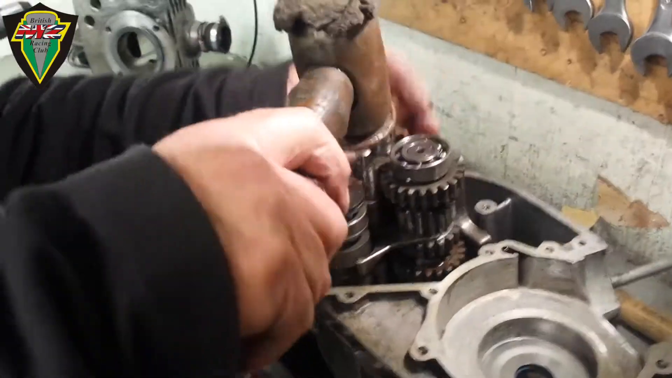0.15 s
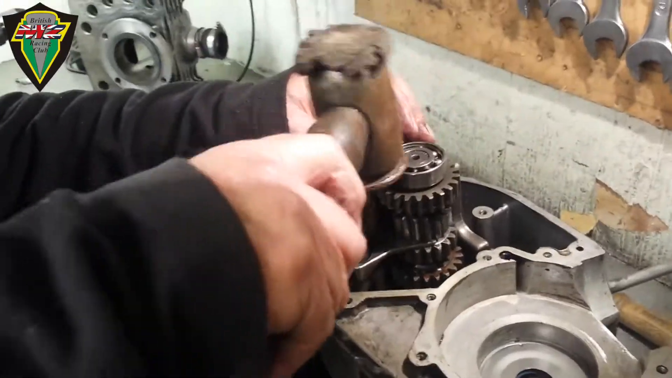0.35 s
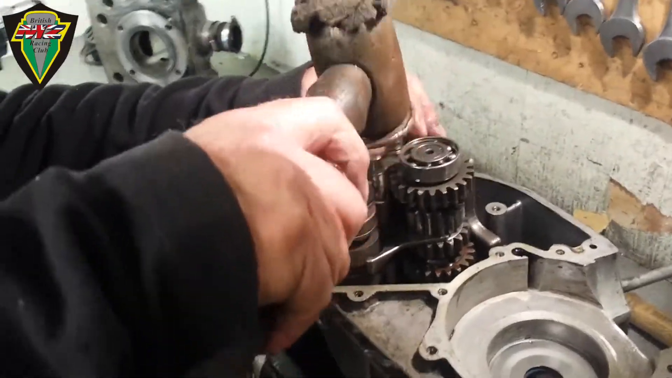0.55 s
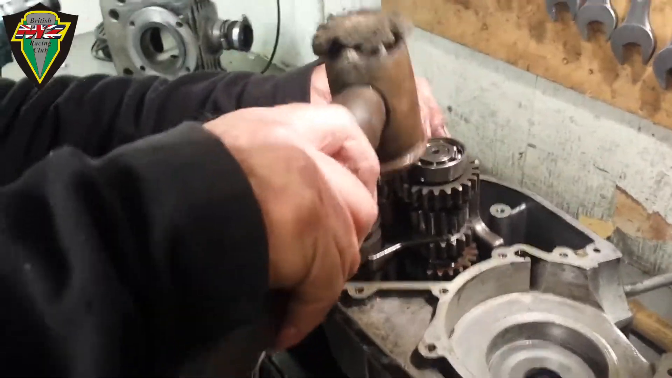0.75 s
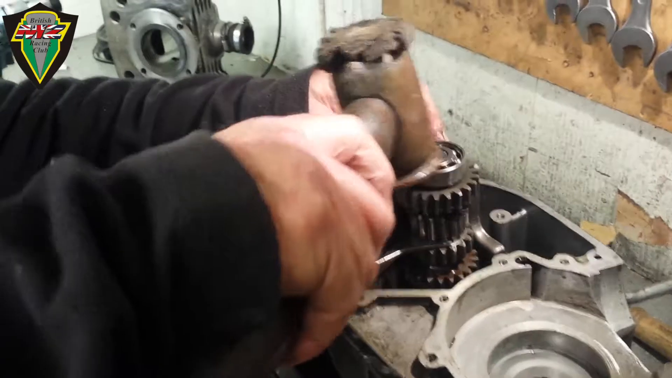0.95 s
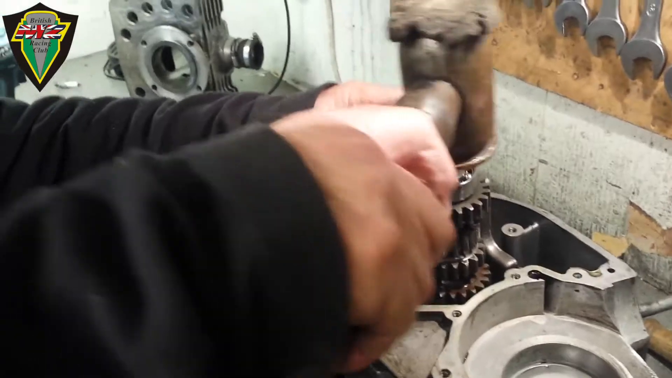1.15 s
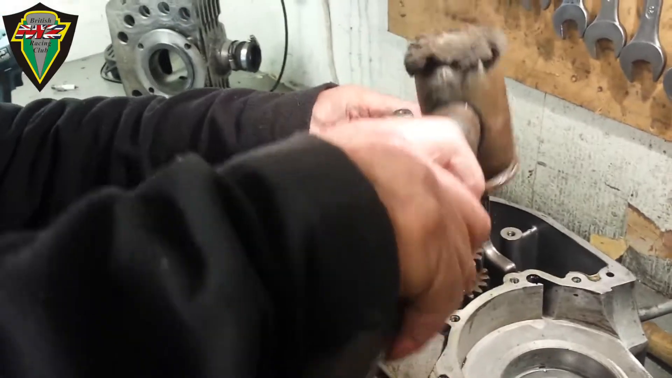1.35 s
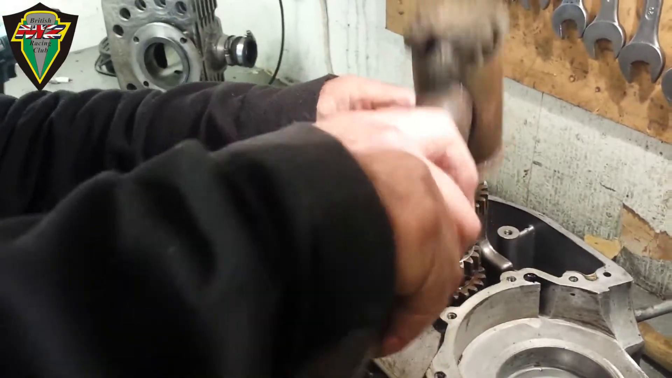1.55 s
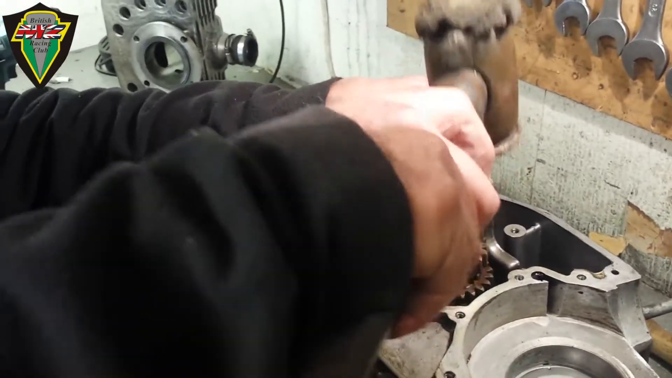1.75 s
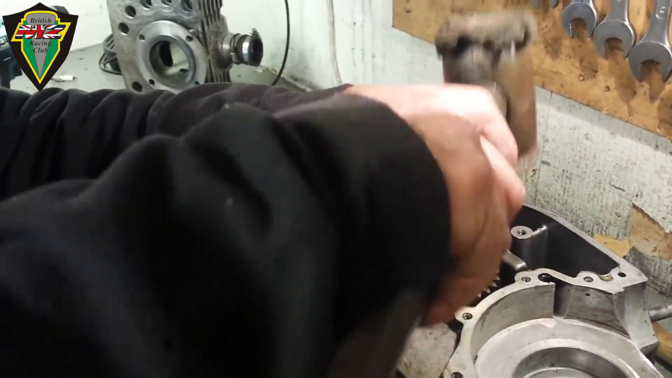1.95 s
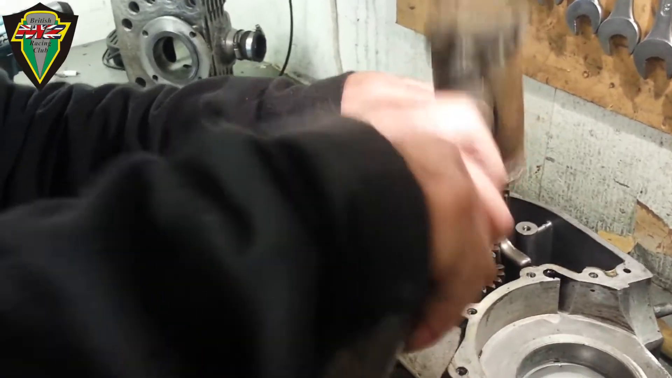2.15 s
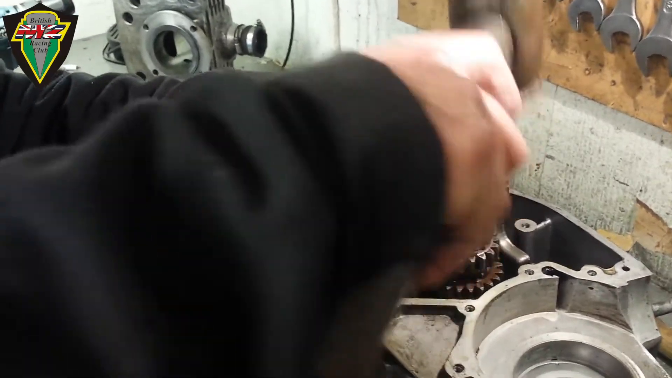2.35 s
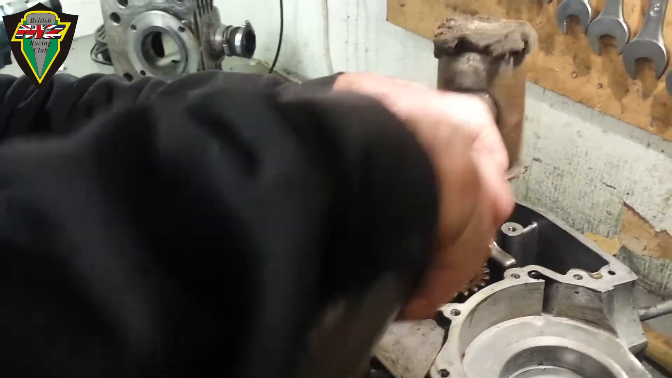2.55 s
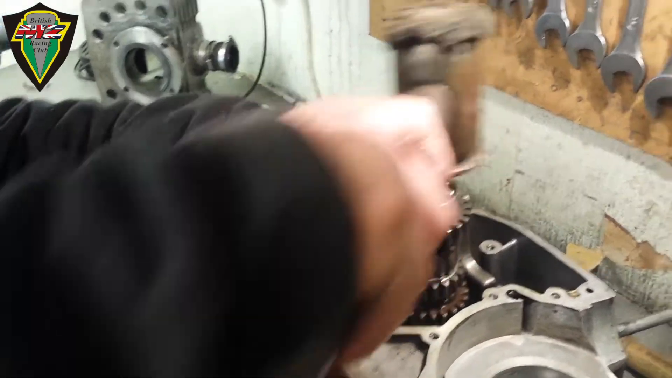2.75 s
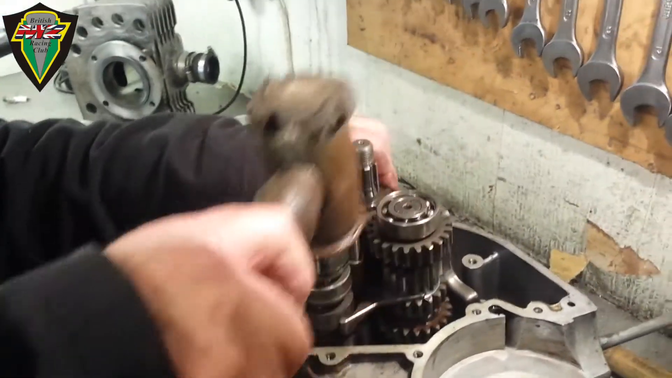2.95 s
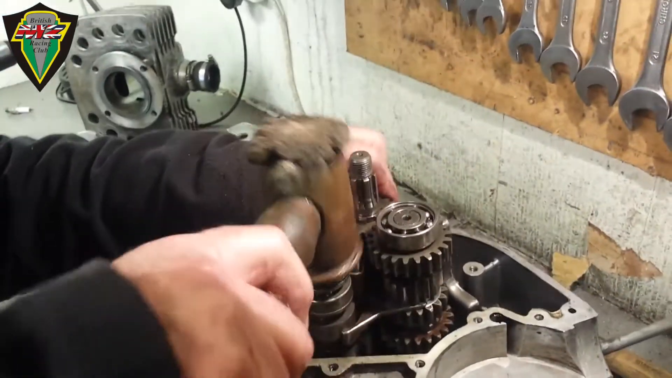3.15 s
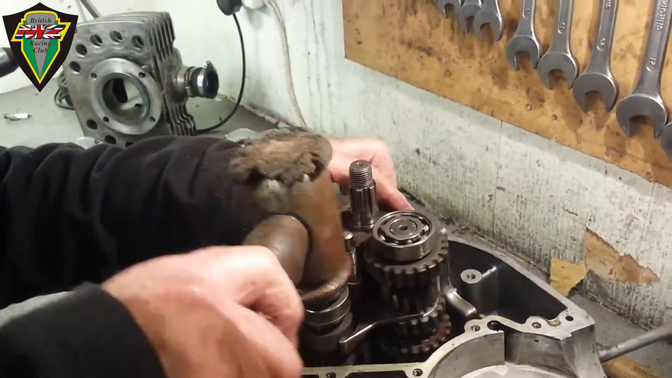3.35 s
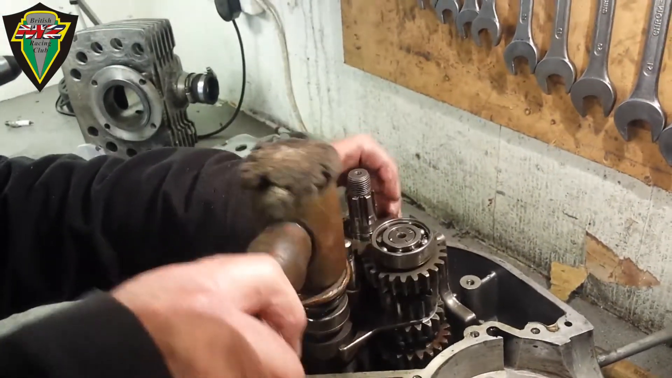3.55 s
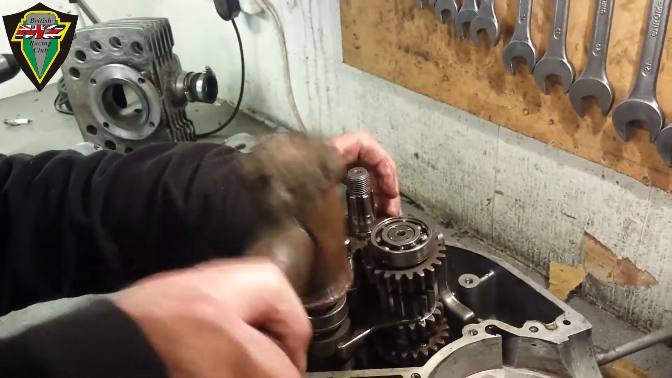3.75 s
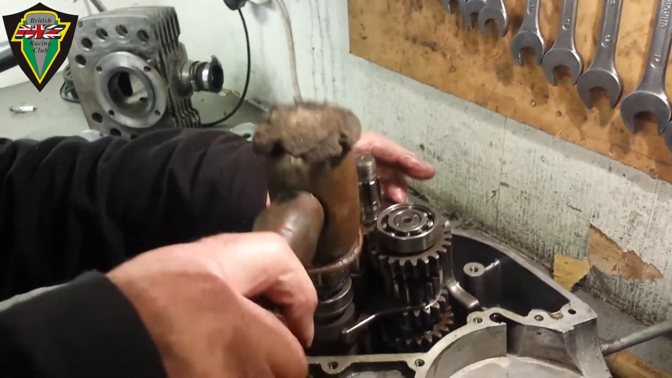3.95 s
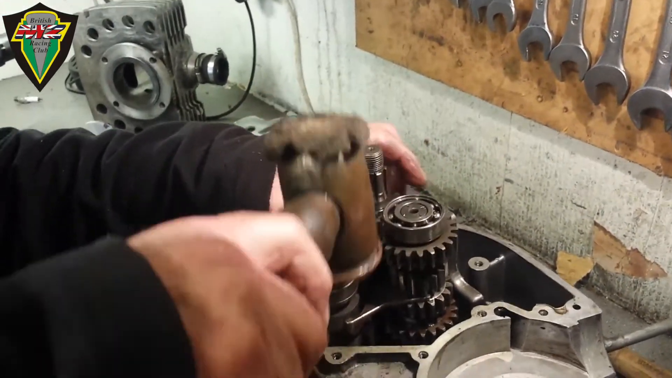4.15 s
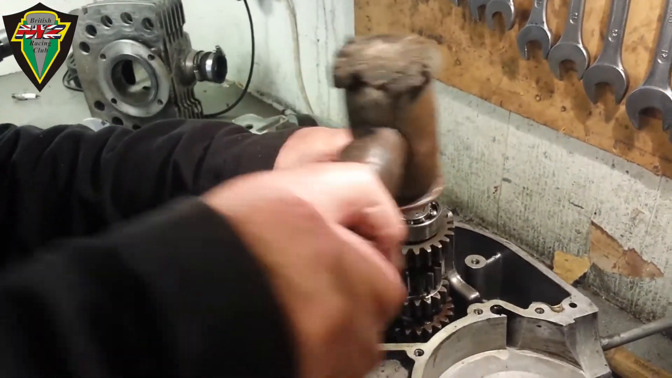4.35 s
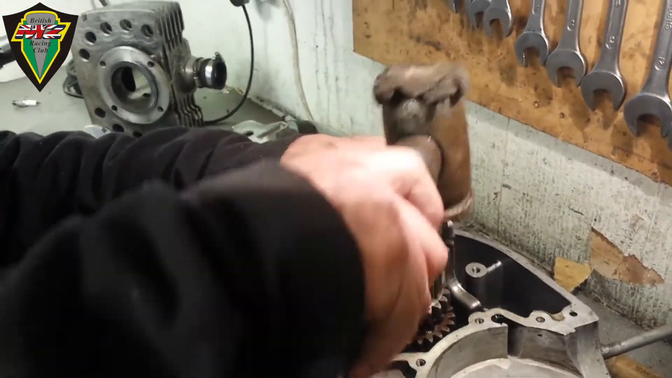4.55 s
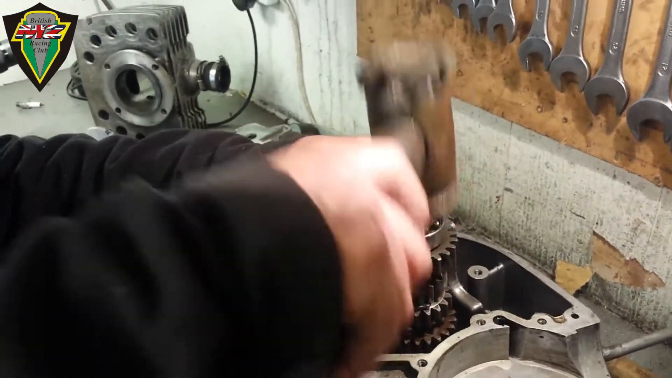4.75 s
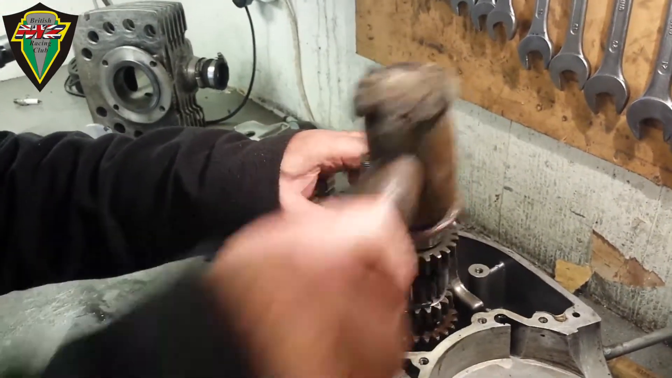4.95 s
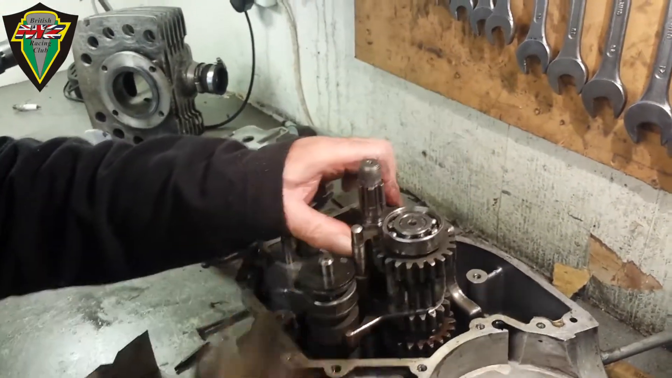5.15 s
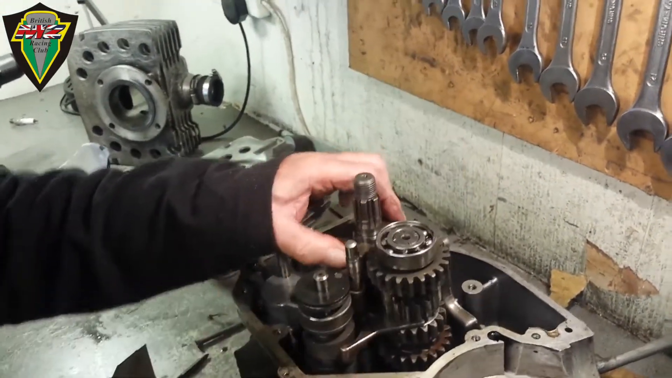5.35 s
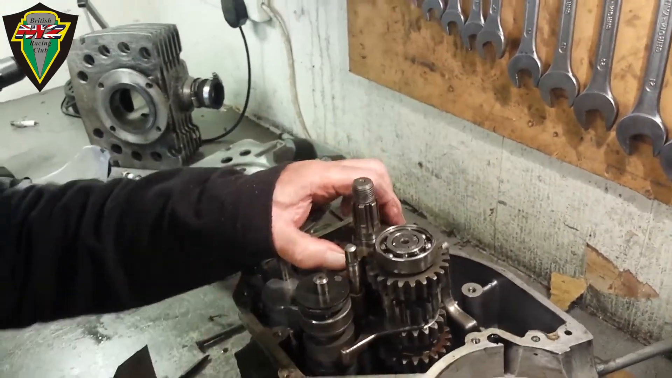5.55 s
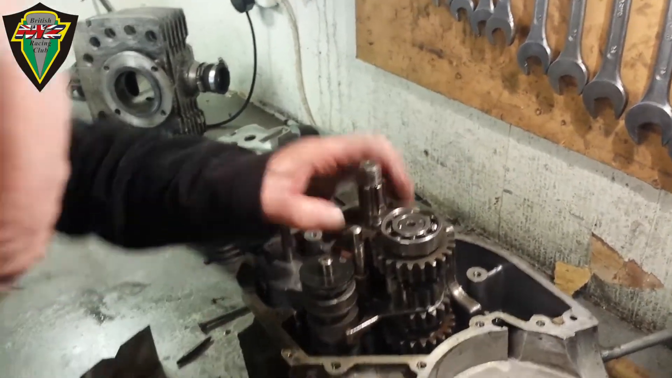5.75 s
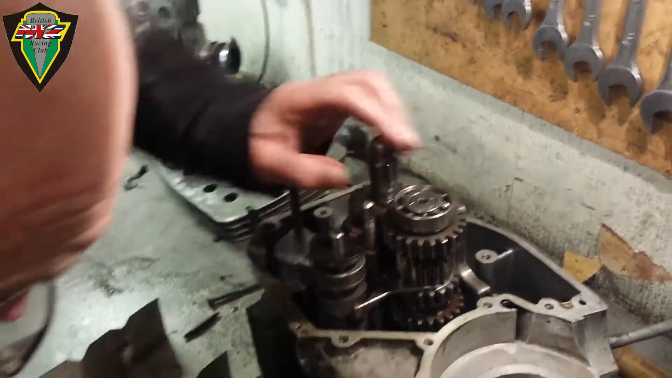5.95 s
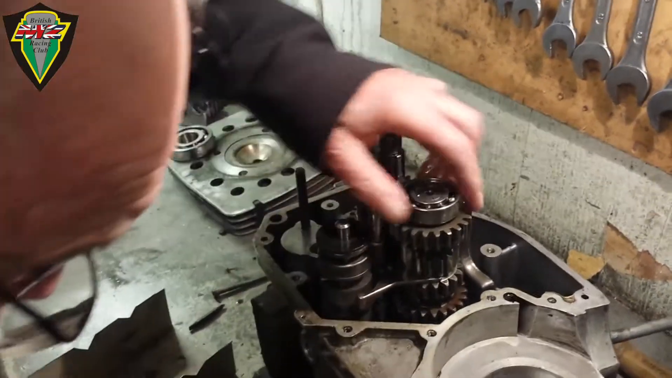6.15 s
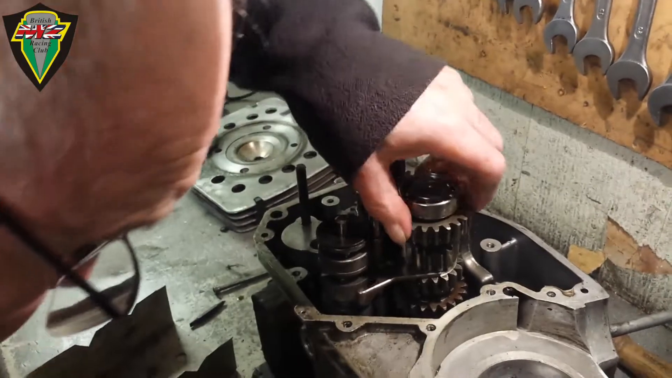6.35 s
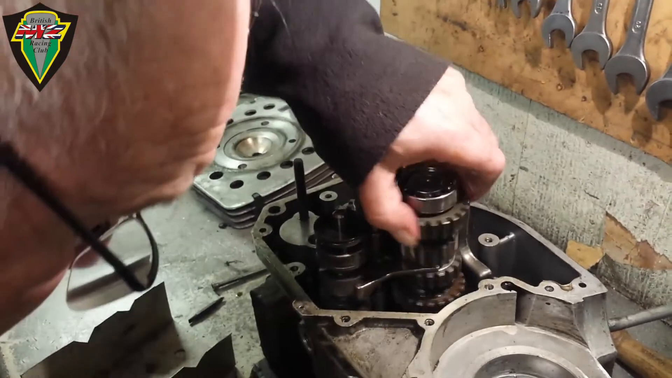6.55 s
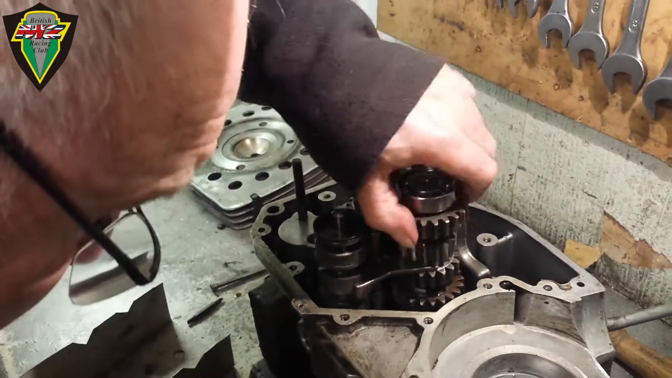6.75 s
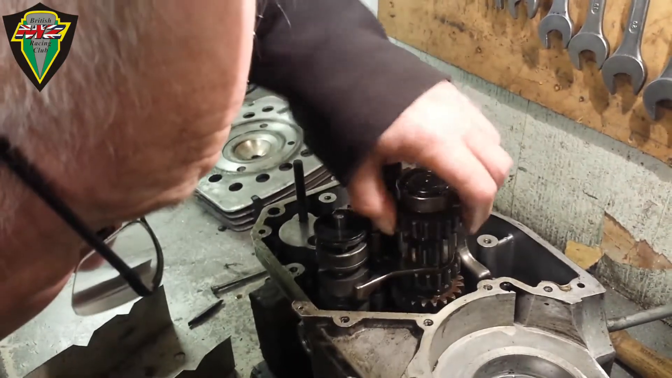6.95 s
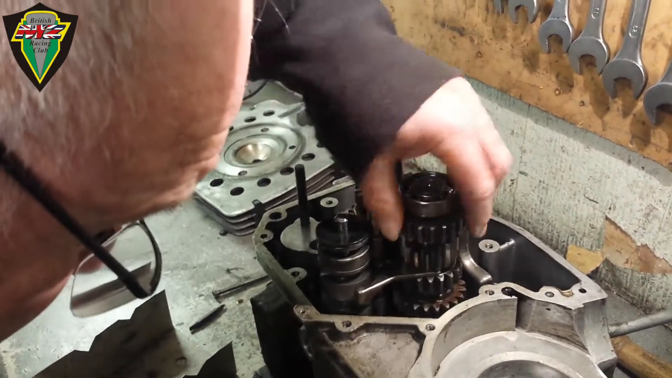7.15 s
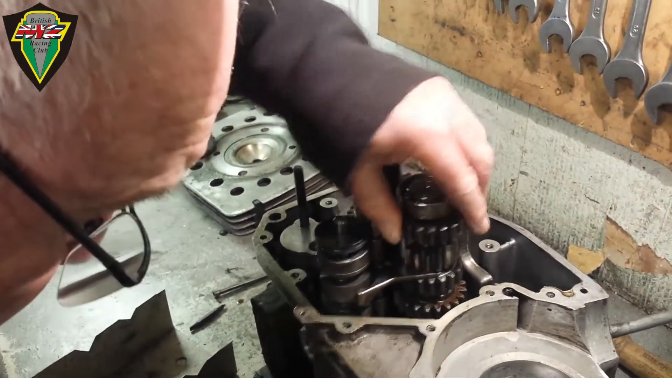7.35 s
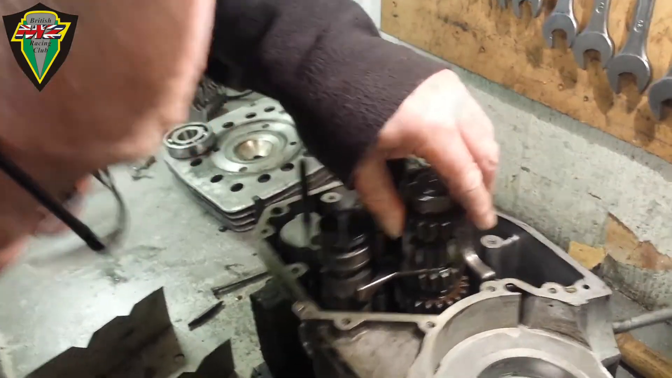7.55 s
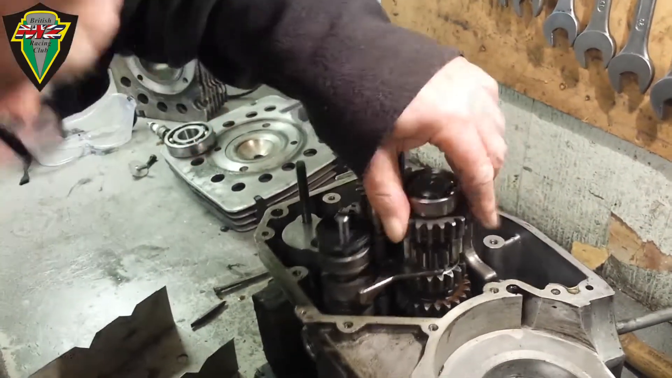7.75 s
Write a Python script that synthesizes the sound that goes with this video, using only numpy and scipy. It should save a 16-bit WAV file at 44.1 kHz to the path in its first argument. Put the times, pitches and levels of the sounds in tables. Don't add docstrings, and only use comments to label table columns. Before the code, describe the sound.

Irregular mallet taps, roughly three or four a second, clatter brightly on gears and casing, with brief pauses and two faint taps midway. The last firm blow is followed by the mallet landing and settling on wood. Room hum and hiss swell up in the lull, then dense small gear clicks, gritty scraping and soft thumps finish it. Close phone pickup, short room echo.

```python
import sys
import numpy as np
from scipy import signal
from scipy.fft import rfft, irfft
from scipy.io import wavfile
from scipy.ndimage import uniform_filter1d

SR = 44100
rng = np.random.default_rng(int(sys.argv[2]) if len(sys.argv) > 2 else 0)


def convert_level_to_amplitude(level_db):
    exponent = np.asarray(level_db, float) / 20
    return 10 ** exponent


def master(y):
    cut = np.clip(np.atleast_2d(y).T, -1, 1)
    pcm = np.round(cut * 32767)
    wavfile.write(sys.argv[1], SR, pcm.astype(np.int16))


N = 344421
HZ = np.fft.rfftfreq(N, 1 / SR)

# t/s, casing peak level/dB, bench level/dB, bright clatter level/dB, note of the struck spot f/Hz
FRONT_BLOWS = [
    (0.4351, -12, -25.5, -18, 1930),
    (0.7369, -6, -8, -14.5, 4140),
    (0.9645, -11.5, -11.5, -14.5, 3262),
]
BACK_BLOWS = [
    (1.3871, -3, -10.5, -9.5, 1717),
    (1.6818, -6.5, -16.5, -24.5, 3300),
    (1.9692, -7, -16.5, -20.5, 1844),
    (2.2693, -6, -16, -16, 2290),
    (2.598, 0, -11, -10, 2406),
    (4.5807, -6.5, -14.5, -12.5, 2660),
    (4.9253, -3.5, -14, -17.5, 2820),
]
LEFT_BLOWS = [
    (3.4015, -11.5, -22, -18.5, 2570),
    (3.6016, -7, -17.5, -12.5, 2840),
    (3.8748, -5, -15, -15.5, 2075),
    (4.1449, -1, -18.5, -16, 2163),
]
LIGHT_BLOWS = [
    (2.823, -36.5, -52, -41.5, 1985),
    (3.2151, -32, -31, -73, 3520),
]
LAID_DOWN = [
    (5.573, -14, -10, -28, 2990),
    (5.805, -26, -11.5, -30, 2740),
    (5.883, -38.5, -26, -37, 1510),
]
# t/s, peak level/dB, f/Hz, 60 dB decay/s
SPOT_NOTES = [(0.4352, -30, 860, 0.059), (0.4352, -20, 2470, 0.053), (2.8235, -46.5, 2050, 0.12),
              (2.824, -50, 5940, .06), (2.824, -48, 4812, 0.036), (3.216, -32, 703, 0.016),
              (0.972, -20, 559, 0.081), (1.388, -14.5, 1700, 0.087), (4.146, -21.5, 782, 0.032),
              (4.158, -24, 336.4, 0.16), (1.971, -22, 3260, 0.059), (2.6, -23.5, 5460, .12),
              (3.402, -25, 654, 0.04), (3.402, -24, 1335, 0.025), (5.576, -25, 723, 0.055),
              (5.577, -35, 1053, 0.11), (5.806, -25.5, 5722, 0.091), (5.808, -36, 1020, 0.16),
              (5.886, -40, 1735, .05)]
# t/s, level/dB
CAGE_SHIVERS = [
    (0.968, -33),
    (2.6, -42.5),
    (4.582, -32),
    (4.927, -29),
]
# t/s, peak level/dB, pitch
# f/Hz
TICKS = [(0.2738, -44, 2060), (0.6448, -48, 2770), (0.6934, -50, 3000), (1.5682, -48, 1780),
         (2.149, -52, 5130), (3.8174, -41, 2770), (4.0494, -53, 1950), (5.7253, -49, 2780),
         (5.819, -33, 2780), (5.831, -33, 2880), (5.7872, -48, 5270),
         (2.98, -48, 1790),
    (3.006, -52, 5340),
    (3.342, -56, 3420),
    (3.388, -44, 2590),
    (5.354, -47, 1790),
    (5.392, -50, 2810),
    (5.415, -50, 1780),
    (6.487, -45, 3030),
    (6.537, -46, 2830),
    (6.585, -48, 2860),
]
# t/s, peak level/dB, main note f/Hz, second note f/Hz
TEETH = [(6.7268, -32.5, 1120, 1840), (6.7371, -29.5, 2790, 5000), (6.7985, -38.5, 2320, 1310),
         (6.8921, -30, 2350, 2815), (6.9152, -34, 2700, 3130), (6.931, -27.5, 1340, 1860),
         (6.9376, -23, 2336, 2804), (7.003, -26, 4382, 7080), (7.0194, -35, 2070, 2820),
         (7.0818, -35.5, 2310, 2670), (7.0873, -36, 2503, 2212), (7.1347, -34.5, 2260, 5700),
         (7.229, -34, 1446, 2820), (7.2552, -36, 1990, 1140), (7.3255, -28.5, 1860, 2820),
         (7.3757, -23, 2000, 5740), (7.3974, -27.5, 1990, 5160), (7.4276, -26.5, 1830, 2370),
         (7.4465, -23, 1920, 3350), (7.4924, -24, 1921, 5260), (7.509, -23, 1834, 5000),
         (7.5458, -38, 2783, 1860), (7.5638, -28, 1830, 2830), (7.5842, -30.5, 1814, 2100),
         (7.612, -23, 1930, 4870), (7.675, -29.5, 1850, 3360), (7.679, -27.5, 7150, 2410),
         (7.7139, -34, 2770, 1740), (7.7369, -29.5, 2860, 2583), (7.8004, -28, 2850, 1840)]
# t/s, peak level/dB
ROLL = [
    (0.797, 3.5),
    (0.825, 1),
    (0.988, -14),
    (5.584, 10.5),
    (5.829, 3),
    (5.846, 4),
    (5.855, 4.5),
    (5.901, -14),
]
# t/s, peak level/dB
THUMPS = [(0.01, -18), (0.4533, -11), (6.726, -44), (6.931, -17.5), (7.326, -15.5), (7.436, -7.5),
          (7.51, -12), (7.579, -11.5), (7.658, -16), (7.711, -5.5), (7.74, -43), (7.793, -7)]
# t/s, effort level/dB
ROCKING = [(6.6, -44), (6.74, -17), (6.87, -35), (6.9, -9.5), (6.94, -1), (7.02, -4), (7.07, -17),
           (7.21, -22), (7.24, -17), (7.3, -15), (7.38, -5.5), (7.55, -2), (7.66, -4.5), (7.81, -20)]
# t/s, level/dB, f/Hz
SHELF = [
    (4.93, -51, 349),
    (2.9, -57, 170),
]

# f/Hz, width/Hz, level/dB
FRONT_RIM = [(1960, 26, -3), (2480, 20, 0), (3270, 23, -3), (4200, 21, -3), (5520, 74, -2), (6090, 25, -5),
             (6380, 35, -2), (6930, 27, 0), (7190, 42, -7)]
FRONT_END = [(2480, 38, -4), (2700, 35, -5), (3640, 23, -6), (4030, 210, -2), (5020, 22, -5),
             (5360, 150, -6), (5750, 45, 0), (6860, 27, -11), (7830, 67, -8)]
FRONT_GEAR = [(1310, 59, -9), (1780, 27, -8), (2800, 45, -9), (3280, 42, 0), (4000, 33, -5), (5030, 31, -5),
              (5940, 37, -7), (6570, 91, -11), (7990, 44, -14)]
BACK = [(1780, 36, -2), (2050, 100, -8), (2350, 36, -2), (2810, 60, -5), (3330, 86, -6), (5440, 37, -9),
        (5650, 42, 0), (6000, 48, -12), (6900, 51, -16), (7580, 160, -18), (8630, 36, -16), (9090, 49, -21)]
LEFT = [(1880, 27, -6), (2060, 22, -2), (2300, 28, 0), (2790, 38, -5), (3470, 30, -8), (4150, 32, -9),
        (4550, 17, -9), (5100, 69, -9), (5670, 78, -1), (6520, 78, -11), (6950, 35, -11), (7780, 27, -17)]
TOP = [(1720, 23, -5), (2400, 24, -5), (2630, 25, -5), (2800, 49, 0), (3600, 57, -10), (3840, 29, -8),
       (4300, 81, -4), (4570, 36, -5)]
GEARS = [(1800, 120, -2), (1920, 200, 0), (2070, 24, -3), (2350, 64, -4), (2810, 60, -5), (3350, 89, -6),
         (4600, 96, -8), (5010, 110, -6), (6900, 83, -13)]
# f/Hz, level/dB, 60 dB decay/s
BENCH = [(117, -19, .8), (130, 0, .24), (173, -4, .12), (205, -22, .5), (217, -6, .13), (250, -6, .1),
         (280, -6, .11), (314, -3, .14), (352, -6, .12), (386, -9, .1), (460, -20, .1), (540, -16, .1),
         (640, -18, .08), (750, -21, .06)]
PLANK = [(135, -4, .18), (180, -5, .07), (208, -9, .1), (312, -6, .09), (336, 0, .1), (381, -5, .09),
         (498, -8, .08), (540, -7, .06), (580, -4, .06), (670, -13, .07), (870, -16, .06), (990, -16, .08),
         (1250, -18, .08), (1450, -21, .06)]
PLANK_END = [(131, -2, .2), (178, -1, .06), (222, -7, .11), (300, -9, .06), (338, -2, .11), (390, -4, .09),
             (464, -14, .12), (540, -13, .1), (690, -9, .09), (745, -11, .09), (860, -9, .08),
             (1080, -17, .06), (1300, -17, .05)]
LEGS = [(57, 0, .5), (62, -8, .3)]
THUD = [(165, 0, .05), (235, -1, .045), (300, -2, .04), (365, -4, .04)]
MALLET = [(5670, 0, .16), (5570, -3, .1), (5770, -4, .08), (7790, -15, .12), (11350, -24, .1),
          (13070, -22, .1), (14900, -28, .07)]
MALLET_SIDE = [(5650, -4, 0.065), (5200, -6, 0.053), (7780, -3, 0.49), (11270, -6, 0.09),
               (13070, -13, 0.21), (14800, -20, .08)]
SEATED_SHAFT = [(2062, 0, .42), (2600, -6, .35), (3400, -6, .12)]
# f/Hz, level/dB
CLATTER = [(440, -10), (720, -15), (1130, -21), (1800, -12.5), (2800, -15), (5740, -15.5), (7500, -19),
           (16000, -38.5)]
FRONT_CLATTER = [(440, -10), (1200, -13), (2000, -18), (2600, -10), (4170, -8.5), (5740, -8.5), (7500, -22),
                 (16000, -50)]
TOOTH_CLATTER = [(440, -10.5), (1200, -23.5), (1900, -15.5), (2800, -11.5), (4170, -13.5), (5400, -8.5),
                 (7500, -15.5), (16000, -37)]

# f/Hz, level/dB, 60 dB decay/s
ECHO = [(60, 11.5, 0.91), (250, 5.5, 0.28), (1010, 7.5, 0.25), (3000, -3.5, 0.3), (7200, -0.5, 0.25),
        (12200, 9.5, 0.15)]
# f/Hz, level/dB
AIR_COLOUR = [(25, -0.5), (75, -6.5), (120, -9), (350, -3), (800, -12.5), (1750, -17.5), (10500, -24.5),
              (15500, -36)]
# f/Hz, level over air or hiss/dB
HUM = [(118, -1), (350, -7), (10050, 1), (11300, -4), (14000, -12)]
# t/s, gain level/dB
GAIN = [(0, -1), (.42, -5), (.95, -7), (1.37, -10.5), (1.96, -18), (2.58, -24.5), (2.95, -20), (3.2, -21.5),
        (3.58, -18), (4.1, -18), (4.56, -23.5), (4.9, -21), (5.3, -20.5), (5.55, -17), (6.0, -13),
        (6.6, -8), (7.07, -4.5), (7.81, -1.5)]
# f/Hz, level/dB
PORT_DB = [(400, -1), (800, 0.5), (1400, -1), (2400, 12), (4400, 10), (6500, 10), (8500, -10),
           (15000, -17.5)]
# f/Hz, phase/rad
PORT_LEAD = [(0, 0), (780, 0.5), (2070, 0.57), (3500, 2.5), (5680, 3), (8180, 5.5), (11000, 3),
             (16000, 5.5)]


def blows(taps, body, colour, base, head, steel, wood, mallet,
          mode_db, top_db, mallet_db, legs_db, down, thuds_db=(10, 5), steel_lag=0):
    onto_casing = down > 0
    bench_lag = .0044 * onto_casing
    for s, mid_db, low_db, high_db, hz in taps:
        mid, high, top = clatter(colour, hold=0.0067, t60=0.041, grain_db=4.0, wash_db=-5, wash_t60=0.25)
        rattle = peak(mid, mid_db - 7) + peak(high, high_db - 2.5) + peak(top, mid_db + top_db)
        add(steel, s + steel_lag, rattle)
        casing = ring(body + [(hz, -4, .025)], 0.23, scatter_db=2.0, rise=0.0016)
        add(mallet, s + steel_lag, convert_level_to_amplitude(mid_db + mode_db + 1.5) * casing)
        mallet_ring = choked(ring(head, .15, scatter_db=1.5, rise=.005))
        add(mallet, s, convert_level_to_amplitude(mid_db + mallet_db) * mallet_ring)
        bench = band(ring(base, .7, scatter_db=1.5, rise=0.0005), 160, 6000)
        add(wood, s + bench_lag, down * convert_level_to_amplitude(low_db + 8.5) * bench)
        for late, thud_db in zip((0, .023), thuds_db):
            thud = band(ring(THUD, .07, scatter_db=3.5, rise=0.00056), 83, 440)
            add(wood, s + bench_lag + late * onto_casing, onto_casing * convert_level_to_amplitude(low_db + thud_db) * thud)
        add(wood, s, convert_level_to_amplitude(low_db + legs_db) * ring(LEGS, .6, scatter_db=1.5, rise=.03))


def clatter(colour, hold, t60, grain_db, wash_db, wash_t60):
    t = np.arange(16384) / SR
    grain = grain_db * np.repeat(rng.standard_normal(512), 32)
    bounce = convert_level_to_amplitude(grain - 60 * np.maximum(t - hold, 0) / t60)
    wash = convert_level_to_amplitude(wash_db - 60 * t / wash_t60)
    x = rng.standard_normal(16384) * (bounce + wash) * (1 - np.exp(-t / 0.0003))
    hz = np.fft.rfftfreq(16384, 1 / SR)
    over_mid = 1 / (1 + (4500 / (hz + 1)) ** 8)
    over_high = 1 / (1 + (9000 / (hz + 1)) ** 8)
    ranges = np.array([1 - over_mid, over_mid - over_high, over_high])
    no_bass = 1 / (1 + (300 / (hz + 1)) ** 4)
    y = irfft(rfft(x) * convert_level_to_amplitude(on_log(colour, hz)) * no_bass * ranges)
    return y[:, :15000] * np.minimum(t[:15000] / 0.00012, 1)


def ring(modes, length, scatter_db, rise):
    t = np.arange(int(length * SR)) / SR
    hz, db, t60 = np.transpose(modes)[:, :, None]
    detune, phase, strength = rng.standard_normal((3, len(hz), 1))
    wave = np.sin(2 * np.pi * hz * (1 + 0.003 * detune) * t + np.minimum(hz / 1500, 3) * phase)
    notes = convert_level_to_amplitude(db + scatter_db * strength) * wave * convert_level_to_amplitude(-60 * t / t60)
    y = notes.sum(axis=0) * (1 - np.exp(-t / rise))
    return y / np.abs(y).max()


def damped(peaks, ring_share):
    return [(hz, db + 10 * np.log10(width / 100), ring_share * np.log(1000) / np.pi / (width + 40))
            for hz, width, db in peaks]


def choked(x):
    t = np.arange(len(x)) / SR
    return x * (.06 + .94 * np.clip((.052 - t) / .015, 0, 1))


def seated(taps, track, ring_db, held):
    for s, mid_db, *_ in taps:
        notes = ring(SEATED_SHAFT, .45, scatter_db=1.5, rise=.003)
        add(track, s, convert_level_to_amplitude(mid_db + ring_db) * (choked(notes) if held else notes))


def knocks(steel, notes):
    for s, db, hz, t60 in SPOT_NOTES:
        add(notes, s, convert_level_to_amplitude(db) * ring([(hz, 0, t60)], .3, scatter_db=0, rise=.001))
    t = np.arange(16000) / SR
    cage_t60 = .3
    for s, db in CAGE_SHIVERS:
        shiver = unit(band(band(rng.standard_normal(16000), 4750, 5550), 4750, 5550))
        add(steel, s, convert_level_to_amplitude(db - 5.5 - 60 * t / cage_t60) * (1 - np.exp(-t / .01)) * shiver)


def ticks(rows, steel, tones, colour, t60, noise_db, ring_db, note_db, bright_db):
    for s, db, *notes in rows:
        mid, high, top = clatter(colour, hold=0.0057, t60=t60, grain_db=6.0, wash_db=-18.5, wash_t60=.14)
        brightness_db = bright_db + 6 * np.log2(notes[0] / 2000)
        add(steel, s, peak(mid, db + noise_db) + peak(high + top, db + brightness_db))
        gears = ring(damped(GEARS, 1.2) + [(2068, -13, .15)], .15, scatter_db=3.5, rise=.0008)
        add(steel, s, convert_level_to_amplitude(db + ring_db) * gears)
        own_modes = [(hz, -5 * k, min(.04, 100 / hz)) for k, hz in enumerate(notes)]
        add(tones, s, convert_level_to_amplitude(db + note_db) * ring(own_modes, .1, scatter_db=.7, rise=.001))


def rocking(steel, wood):
    for s, db in THUMPS:
        thump = ring(THUD + [(133.7, -9.5, 0.2), (58.5, -8.5, 0.12)], .4, scatter_db=2.5, rise=0.004)
        add(wood, s, convert_level_to_amplitude(db - 5) * thump)
    for s, db in ROLL:
        add(wood, s, convert_level_to_amplitude(db - 19.5) * ring(PLANK[3:10], .2, scatter_db=2.0, rise=0.0024))
    for s, db, hz in SHELF:
        swell = np.hanning(int(.7 * SR)) ** .2
        add(wood, s, convert_level_to_amplitude(db) * ring([(hz, 0, 2.5)], .7, scatter_db=0, rise=.03) * swell)
    hand_on = np.interp(np.arange(N) / SR, [6.6, 6.75], [0, 1])
    effort_db = curve(ROCKING, 1)
    bench = ring(BENCH + [(58, -3, .3)], .1, scatter_db=1.4, rise=.003)
    rumble = unit(signal.fftconvolve(rng.standard_normal(N), bench)[:N])
    roughness = np.repeat(rng.standard_normal(N // 90 + 1), 90)[:N]
    grit = rng.standard_normal(N) * convert_level_to_amplitude(4.0 * roughness)
    gears = sum(convert_level_to_amplitude(db) / (1 + (2 * (HZ - hz) / (width + 60)) ** 2) for hz, width, db in GEARS)
    scrape = unit(irfft(rfft(grit) * convert_level_to_amplitude(on_log(CLATTER, HZ)) * (.25 + gears), N))
    steel = steel + hand_on * convert_level_to_amplitude(-37 + 1.1 * effort_db) * scrape
    return steel, wood + hand_on * convert_level_to_amplitude(-29 + effort_db) * rumble


def two_ports(struck):
    lead = np.interp(HZ, *np.transpose(PORT_LEAD))
    port = convert_level_to_amplitude(on_log(PORT_DB, HZ))
    left = 2 / np.sqrt(1 + np.abs(port) ** -2)
    board = 1 + convert_level_to_amplitude(-16.5) * np.exp(-2j * np.pi * HZ * .0098)
    ports = np.array([causal(left), causal(left / port) * np.exp(-1j * lead)])
    return irfft(rfft(struck) * board * ports, N)


def causal(gain):
    c = irfft(np.log(gain), N)
    c[1:(N + 1) // 2] *= 2
    c[N // 2 + 1:] = 0
    return np.exp(rfft(c))


def nearby(x):
    t = np.arange(1500) / SR
    spray = rng.standard_normal((2, 1500)) * convert_level_to_amplitude(-60 * t / 0.022) * np.clip(t / 0.018, 0, 1)
    spray = spray / np.sqrt(np.sum(spray ** 2, axis=1, keepdims=True))
    return signal.fftconvolve(x[None], spray, axes=1)[:, :N]


def workshop(x):
    t = np.arange(30000) / SR
    noise, echo = pair(2500, size=30000), 0
    octave = np.log2(np.fft.rfftfreq(30000, 1 / SR) / 45 + 1e-9)
    decays = [(f, t60) for f, _, t60 in ECHO]
    for k in np.arange(9):
        hz = 45 * 2. ** k
        fade = convert_level_to_amplitude(on_log(ECHO, hz) - 60 * t / on_log(decays, hz))
        echo = echo + fade * irfft(noise * np.clip(1 - np.abs(octave - k), 0, 1))
    echo = echo * np.clip((t - .003) / 0.024, 0, 1) / np.sqrt(SR / 30)
    return signal.fftconvolve(x[None], echo, axes=1)[:, :N]


def floor():
    noise = pair(1600, size=N) * convert_level_to_amplitude(on_log(AIR_COLOUR, HZ))
    low_share = 1 / (1 + (HZ / 1100) ** 2)
    air, hiss = irfft(noise * np.sqrt([[low_share], [1 - low_share]]), N)
    air = air / np.std(band(air[0], 78, 360))
    hiss = hiss / np.std(band(hiss[0], 11650, 13180))
    t = np.arange(N) / SR
    wobble = unit(uniform_filter1d(rng.standard_normal((5, N)), size=1500, axis=1))
    lines = [convert_level_to_amplitude(db + 2.0 * w) * np.sin(2 * np.pi * hz * t + w) for (hz, db), w in zip(HUM, wobble)]
    gain_db = curve(GAIN, 1)
    return convert_level_to_amplitude(-43.5 + gain_db) * (air + sum(lines[:2])) + convert_level_to_amplitude(-62 + gain_db) * (hiss + sum(lines[2:]))


def pair(alike_hz, size):
    mid, side = rfft(rng.standard_normal((2, size)))
    share = np.clip(np.fft.rfftfreq(size, 1 / SR) / alike_hz, .05, 1)
    return np.array([mid + share * side, mid - share * side]) / np.sqrt(1 + share ** 2)


def on_log(table, hz):
    f, v = np.transpose(table)[:2]
    return np.interp(np.log(hz + 1), np.log(f + 1), v)


def curve(table, column):
    return np.interp(np.arange(N) / SR, [r[0] for r in table], [r[column] for r in table])


def unit(x):
    return x / np.sqrt(np.mean(x ** 2))


def peak(x, db):
    return x * convert_level_to_amplitude(db) / np.sqrt(2 * uniform_filter1d(x ** 2, size=88).max())


def band(x, lo_hz, hi_hz):
    sos = signal.butter(2, [lo_hz, min(hi_hz, SR / 2.2)], "band", fs=SR, output="sos")
    return signal.sosfilt(sos, x)


def add(track, s, x):
    i = int(s * SR)
    track[i:i + len(x)] += x[:N - i]


def scene():
    steel, wood, mallet = np.zeros((3, N))
    tracks = (steel, wood, mallet)
    share = .6
    spots = (FRONT_RIM, FRONT_END, FRONT_GEAR)
    colours = (CLATTER, FRONT_CLATTER, FRONT_CLATTER)
    front_thuds_db = ((-5, -3.5), (7.5, 4), (7.5, 0.5))
    for tap, spot, colour, thuds_db in zip(FRONT_BLOWS, spots, colours, front_thuds_db):
        blows([tap], damped(spot, 1.5 * share), colour, BENCH, MALLET, *tracks,
              mode_db=0.5, top_db=-16.0, mallet_db=-38.5, legs_db=-10.0, down=0.98, thuds_db=thuds_db)
    blows(BACK_BLOWS, damped(BACK, share), CLATTER, BENCH, MALLET, *tracks,
          mode_db=-2.5, top_db=-21.0, mallet_db=-15.5, legs_db=-17.5, down=1)
    blows(LEFT_BLOWS + LIGHT_BLOWS, damped(LEFT, share), CLATTER, BENCH, MALLET, *tracks,
          mode_db=-4.5, top_db=-29, mallet_db=-26.0, legs_db=-15.5, down=1.0)
    seated(LEFT_BLOWS[2:3], mallet, ring_db=-24, held=False)
    seated(LEFT_BLOWS[3:], mallet, ring_db=-33, held=False)
    seated(LIGHT_BLOWS, mallet, ring_db=-15, held=True)

    top = damped(TOP, share)
    blows(LAID_DOWN[:1], top, CLATTER, PLANK_END, MALLET, *tracks,
          mode_db=-8, top_db=-28, mallet_db=-6, legs_db=-34, down=-1, steel_lag=.0045)
    blows(LAID_DOWN[1:2], top, CLATTER, PLANK, MALLET_SIDE, *tracks,
          mode_db=-8, top_db=-25, mallet_db=0, legs_db=-28, down=-1)
    blows(LAID_DOWN[2:], top, CLATTER, PLANK[4:], MALLET, *tracks,
          mode_db=7.0, top_db=-17.5, mallet_db=-34, legs_db=-21, down=-1.96)

    ticks(TICKS, steel, mallet, CLATTER,
          t60=.05, noise_db=-1, ring_db=-8, note_db=-9, bright_db=-12)
    ticks(TEETH, steel, mallet, TOOTH_CLATTER,
          t60=0.031, noise_db=0.5, ring_db=-9.5, note_db=2.0, bright_db=-11)
    knocks(steel, mallet)
    seated(TEETH[15:20], mallet, ring_db=-13.5, held=True)
    steel, wood = rocking(steel, wood)
    wood = band(wood, 50, 9000)

    bench = np.array([wood, 0.88 * wood + 0.2 * np.roll(wood, shift=70)])
    direct = two_ports(steel + mallet) + bench
    near_wood = band(band(wood, 100, 3000), 100, 3000)
    scattered = nearby(convert_level_to_amplitude(-11) * band(steel + mallet, 280, 14000) + convert_level_to_amplitude(-10.5) * near_wood)
    room_wood = band(band(wood, 170, 2800), 170, 2800)
    room = workshop(convert_level_to_amplitude(-4.5) * steel + convert_level_to_amplitude(-8.5) * mallet + convert_level_to_amplitude(-7.5) * room_wood)
    return direct + scattered + room + floor()


def low_pass(x):
    return signal.sosfilt(signal.butter(12, 16600, fs=SR, output="sos"), x)


def record(dry):
    no_rumble = signal.sosfilt(signal.butter(2, 22, "high", fs=SR, output="sos"), dry)
    rounded = np.tanh(0.87 * no_rumble) / 1.012
    mix = signal.sosfilt(signal.ellip(6, .3, 50, 15700, fs=SR, output="sos"), rounded)
    return low_pass(mix)


dry = scene()
out = record(dry)
master(out)
```